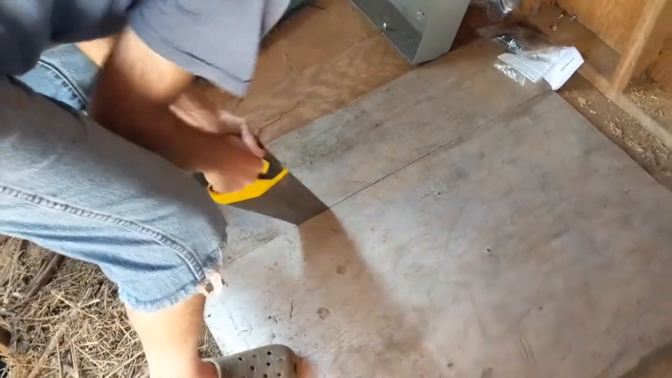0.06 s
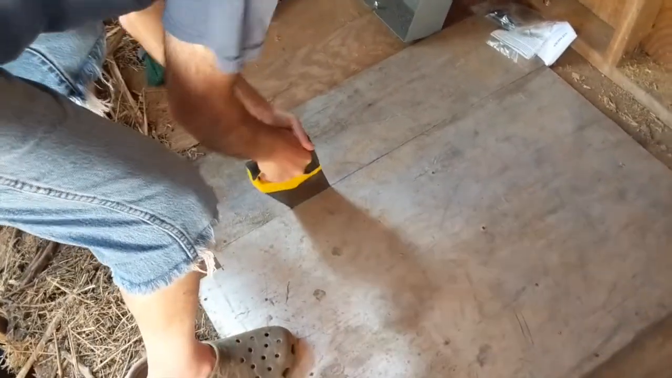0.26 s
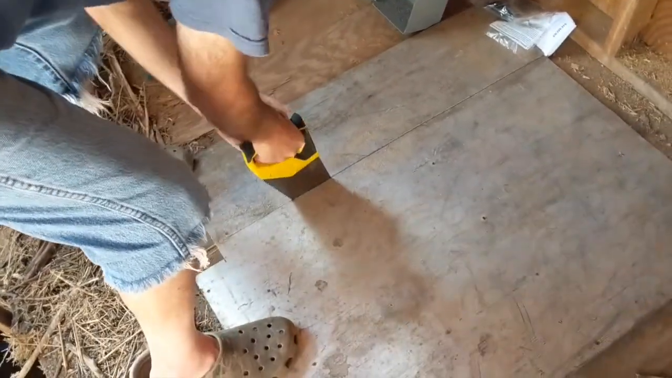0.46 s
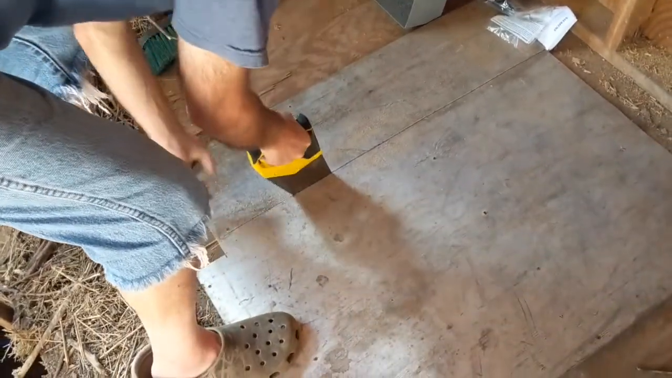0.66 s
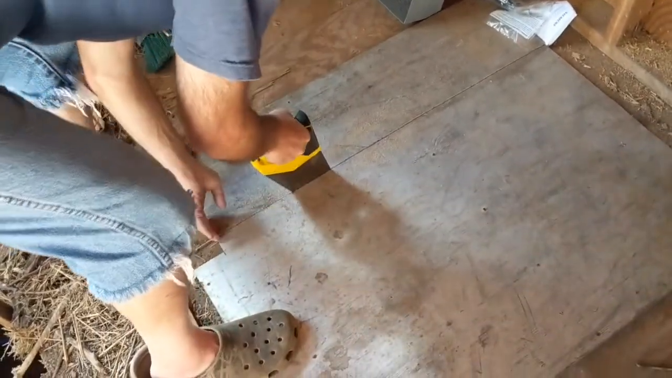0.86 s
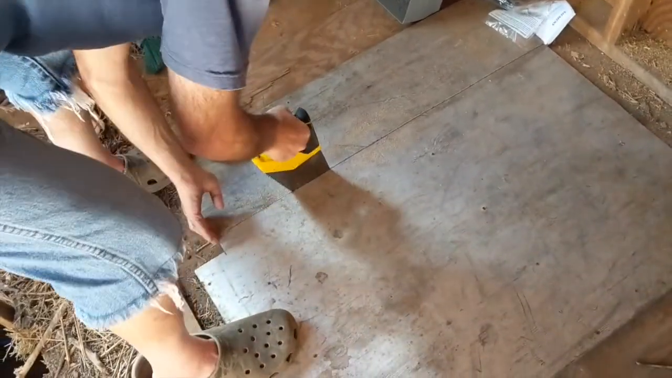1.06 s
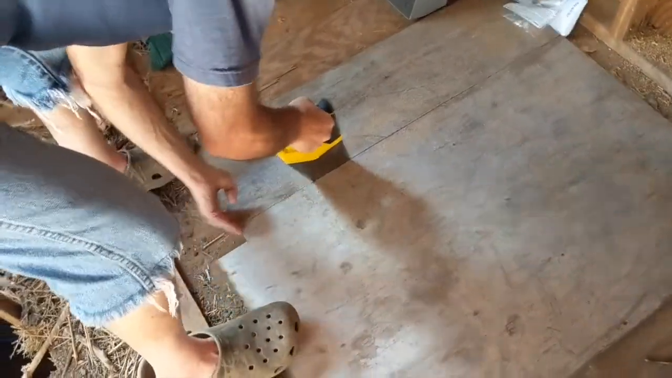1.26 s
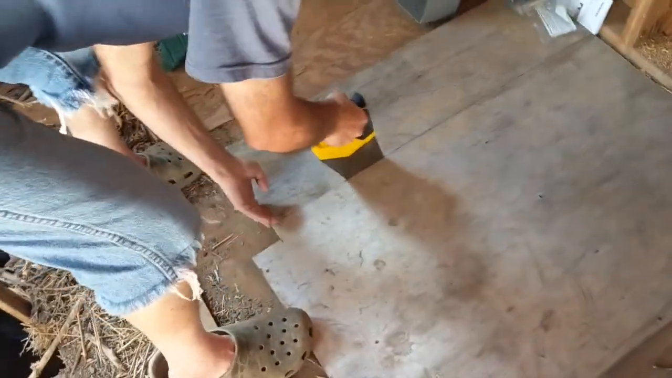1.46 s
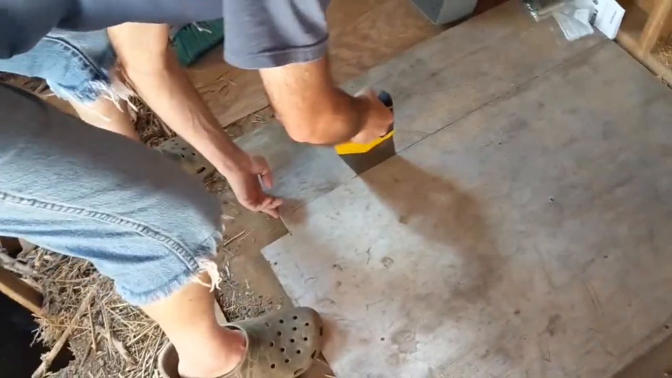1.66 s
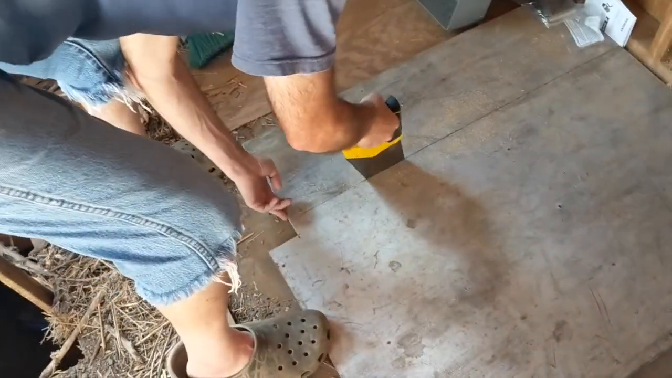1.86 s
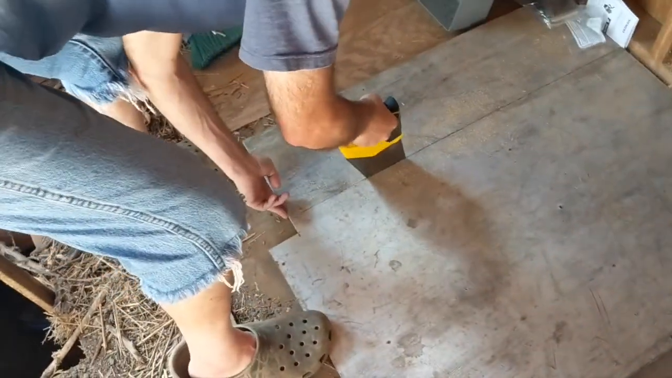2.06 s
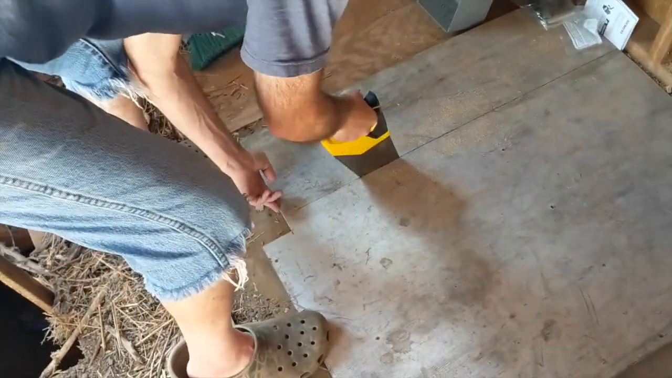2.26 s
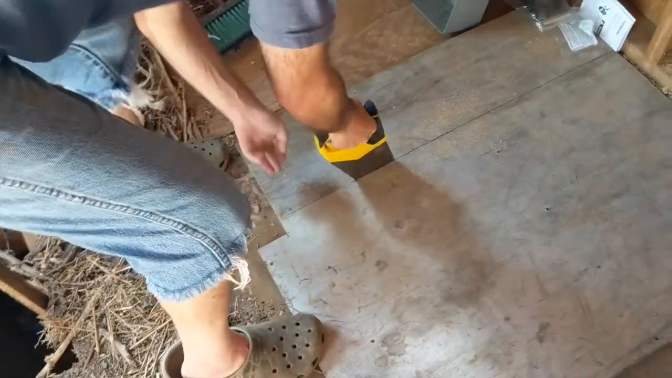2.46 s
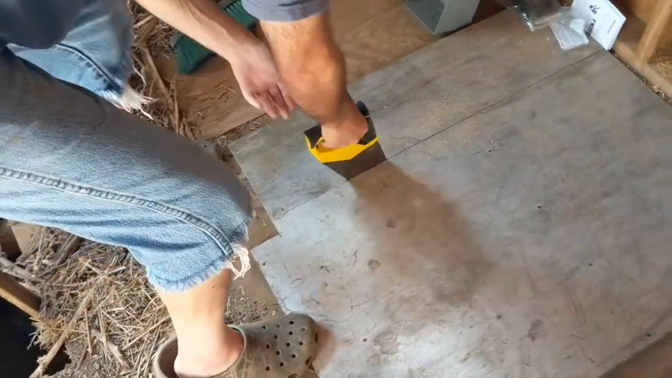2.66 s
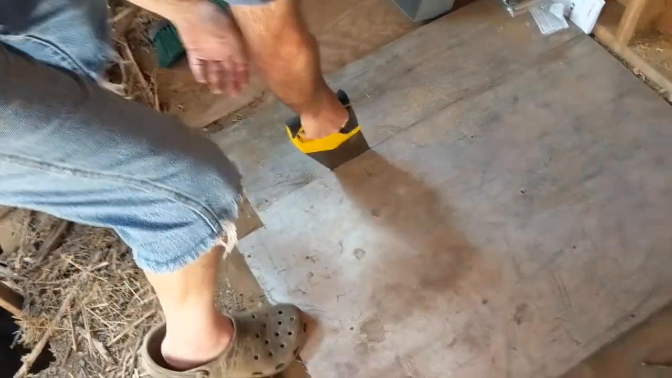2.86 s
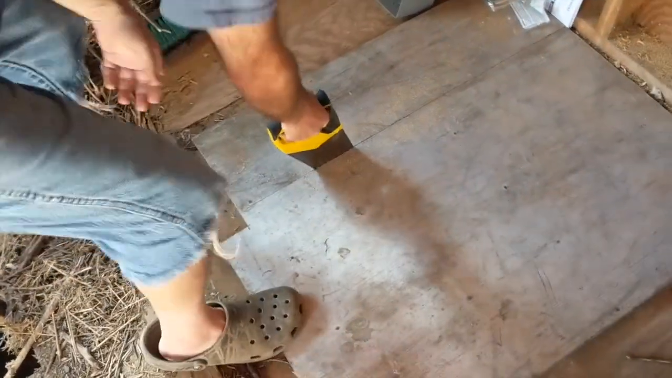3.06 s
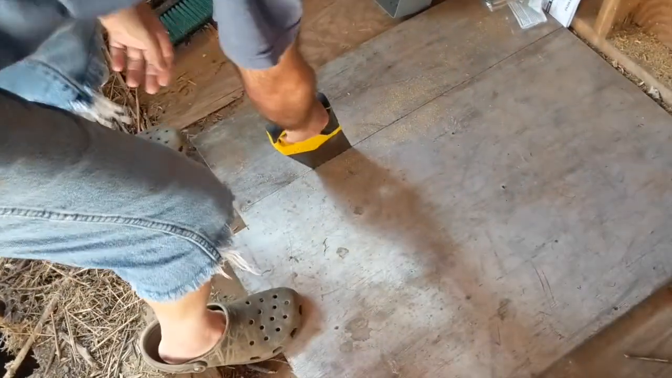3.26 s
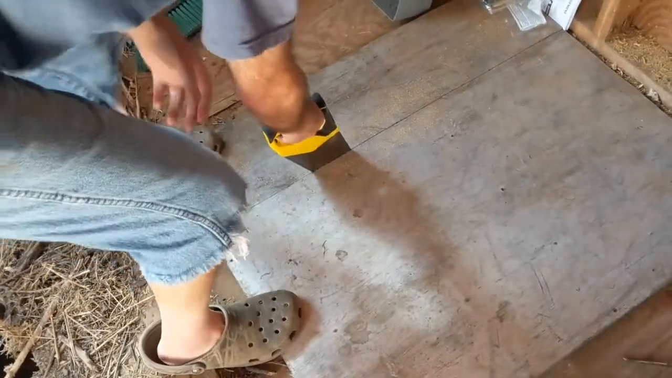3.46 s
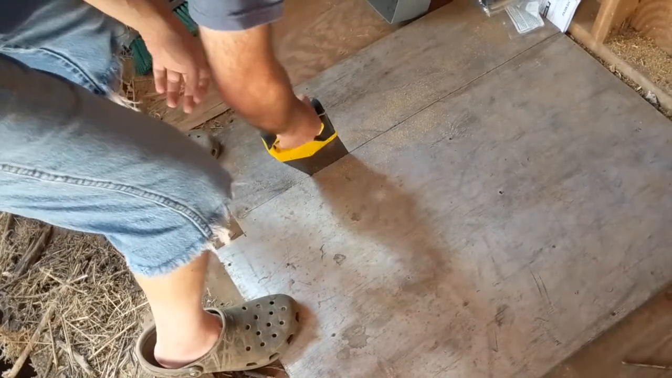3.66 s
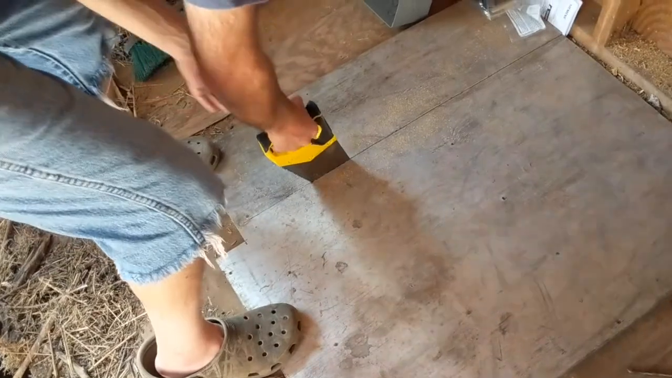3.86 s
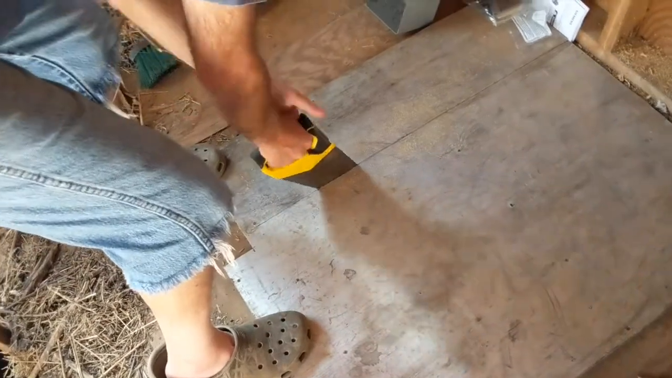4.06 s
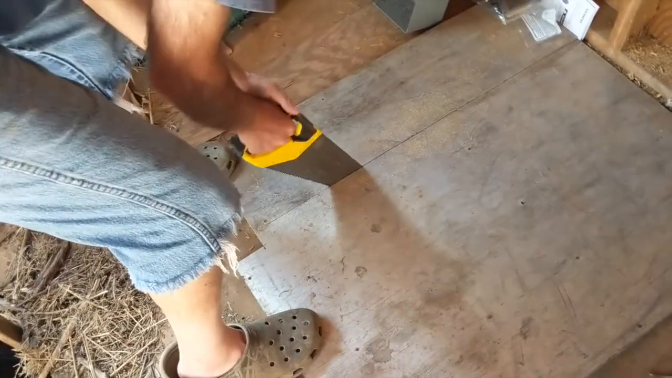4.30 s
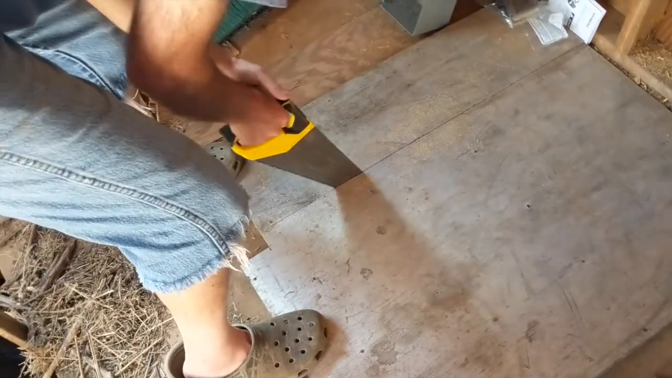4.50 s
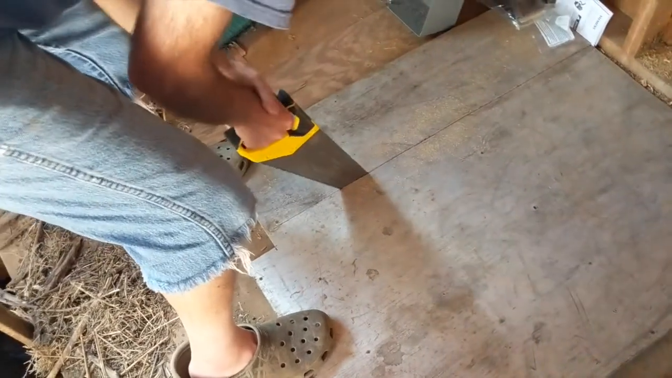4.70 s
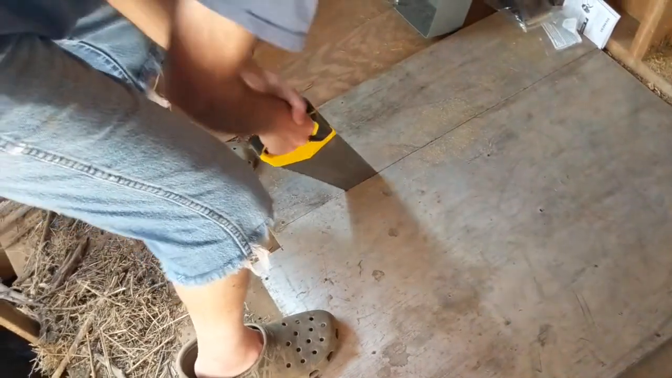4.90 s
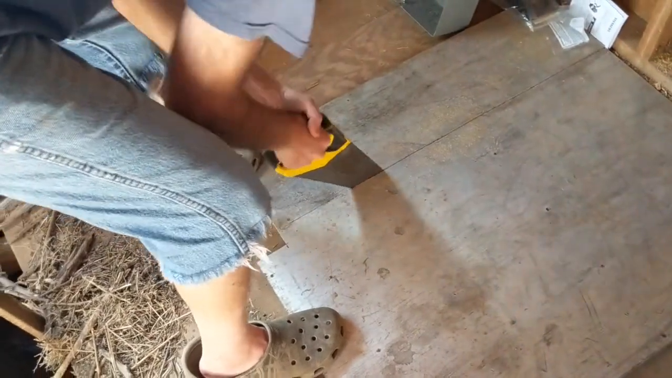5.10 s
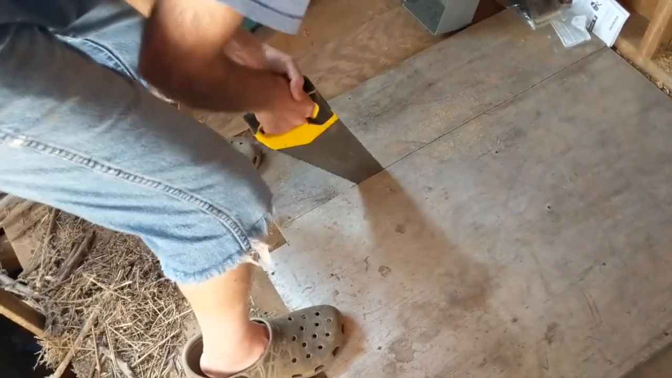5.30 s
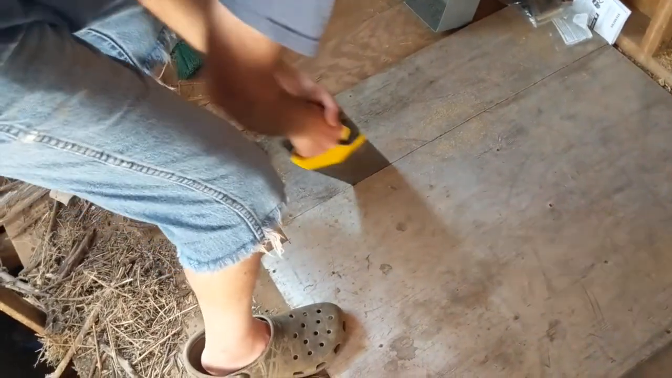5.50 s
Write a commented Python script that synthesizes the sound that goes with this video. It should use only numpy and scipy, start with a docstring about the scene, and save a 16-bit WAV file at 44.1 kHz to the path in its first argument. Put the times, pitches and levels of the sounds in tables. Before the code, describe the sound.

A hand saw cuts a plywood floor panel in a bare room, heard from close by. A few short rasping strokes shake the board, then the blade jams with a heavy thump and rattles in the cut. A quieter stretch follows, with light taps of wood scraps and two more thumps. Uneven strokes resume, juddering, with a sharp steel clack near the end. Very faint hum, hiss and outdoor insects lie behind.

```python
"""Hand saw in plywood

A hand saw cuts a plywood floor panel, already rumbling, in short, uneven strokes, in a bare room. Its
teeth tear fibres, ring the blade and shake the panel. The blade jams and thumps the board, judders and
clacks in the kerf; wood scraps tap the floor. Behind: faint air, mains hum, hiss and insects outdoors."""
import sys
import numpy as np
from scipy import signal
from scipy.fft import rfft, irfft, next_fast_len
from scipy.io import wavfile
from scipy.ndimage import uniform_filter1d, map_coordinates

SR = 44100
rng = np.random.default_rng(int(sys.argv[2]) if len(sys.argv) > 2 else 0)


def master_out(mix):
    """Clip the mix to full scale and print it as 16-bit PCM to the path in sys.argv[1]."""
    frames = np.transpose(np.atleast_2d(mix))
    ceiling = np.clip(frames, -1, 1)
    pcm = np.round(ceiling * 32767).astype(np.int16)
    wavfile.write(sys.argv[1], SR, pcm)


N = 244314


def amp(db):
    """Decibels to gain."""
    return 10 ** (np.asarray(db) / 20)


def unit(x):
    """Scale to rms 1."""
    return x / np.sqrt(np.mean(x ** 2) + 1e-20)


def along(points, hz):
    """Interpolate (frequency [Hz], value) points on a log axis."""
    f, v = np.transpose(points)
    return np.interp(np.log(hz + 1), np.log(f), v)


def wobble(knots_per_s):
    """Smooth random curve."""
    knots = rng.standard_normal(int(N * knots_per_s / SR) + 4)
    return map_coordinates(knots, [np.arange(N) * knots_per_s / SR])


def coloured(x, spectrum):
    """Minimum-phase filter of unit energy with the given spectrum."""
    size = 8192
    cepstrum = irfft(np.log(amp(along(spectrum, np.fft.rfftfreq(size, 1 / SR)))))
    cepstrum[1:size // 2] *= 2
    cepstrum[size // 2 + 1:] = 0
    pulse = irfft(np.exp(rfft(cepstrum)))
    return signal.fftconvolve(x, pulse / np.linalg.norm(pulse))[:len(x)]


def band(hz, width_hz):
    """Narrowband noise, rms 1."""
    f = np.fft.rfftfreq(N, 1 / SR)
    return unit(irfft(rfft(rng.standard_normal(N)) / (1 + (2 * (f - hz) / width_hz) ** 2), N))


def fade(t, t60_s):
    """Exponential decay, 60 dB in t60_s."""
    return np.exp(-np.log(1000) * t / t60_s)


def burst(t, t60_s):
    """Decaying white noise."""
    return rng.standard_normal(len(t)) * fade(t, t60_s)


def ring(modes, t, scatter_db):
    """Decaying modes; strengths and signs vary with each contact."""
    hz, db, t60_s = np.transpose(modes)[:, :, None]
    gain = amp(db + scatter_db * rng.standard_normal(hz.shape)) * rng.choice([-1, 1], hz.shape)
    return np.sum(gain * np.sin(2 * np.pi * hz * t) * fade(t, t60_s), axis=0)


def favouring(modes, hz, db, octaves):
    """The contact point favours modes near hz; the rest drop by up to db."""
    f, level_db, t60_s = np.transpose(modes)
    nearness = np.exp(-(np.log2(f / hz) / octaves) ** 2)
    return np.transpose([f, level_db + db * (nearness - 1), t60_s])


def resonate(x, modes):
    """Drive a modal response of unit energy with x."""
    response = ring(modes, np.arange(SR // 3) / SR, scatter_db=0.5)
    return signal.fftconvolve(x, response / np.linalg.norm(response))[:len(x)]


def add(track, time_s, sound):
    """Mix a sound in at time_s."""
    start = round(time_s * SR)
    track[start:start + len(sound)] += sound[:N - start]


def arch_db(t, start_s, rise_s, hold_s, fall_s):
    """The arm speeds up, holds and slows: 0 dB in the hold, -20 dB at the stroke's start and end."""
    away = np.maximum((start_s + rise_s - t) / rise_s, (t - start_s - rise_s - hold_s) / fall_s)
    return -20 * np.clip(away, 0, 4) ** 1.4


def teeth(speed, tooth_hz=619.5, catch_scatter_db=2.0, fibre_scatter_db=3, rub=0.74):
    """Teeth catch in turn; each tears fibres and tugs the panel. Returns cutting noise and force."""
    rate_hz = tooth_hz * speed * amp(2.2 * wobble(40))
    passing = np.diff(np.floor(np.cumsum(rate_hz) / SR), prepend=0)
    bites = passing * amp(catch_scatter_db * rng.standard_normal(N)) / np.sqrt(rate_hz)
    tearing = unit(signal.fftconvolve(bites, fade(np.arange(SR // 50) / SR, 0.018))[:N])
    fibres = unit(rng.standard_normal(N) * amp(fibre_scatter_db * rng.standard_normal(N)))
    grain = amp(1.67 * wobble(130))  # hard and soft wood layers
    cut = unit(fibres * (rub + tearing) * grain)
    tugs = unit(bites - uniform_filter1d(bites, SR // 150))
    return cut, unit(cut + .5 * tugs)


def fibre_snaps(snaps_per_s=80, scatter_db=3):
    """Thicker fibres snap at random."""
    snaps = (rng.random(N) < snaps_per_s / SR) * amp(scatter_db * rng.standard_normal(N))
    return unit(signal.fftconvolve(snaps, burst(np.arange(SR // 50) / SR, t60_s=0.017))[:N])


def kerf(x, ring_db=-3.5):
    """The narrow cut rings briefly, differently at each stroke."""
    response = burst(np.arange(SR // 16) / SR, t60_s=0.033)
    ringing = unit(signal.fftconvolve(x, response)[:len(x)])
    return unit(x + amp(ring_db) * ringing)


# Panel bending modes (frequency [Hz], level [dB], t60 [s])
PANEL_MODES = [(62.6, -5.5, 0.21), (69.8, -9.5, 0.069), (127.3, -4, 0.16), (150.7, -9, 0.36),
               (185.2, -0.5, 0.12), (229.2, -11.5, 0.36), (277, -13.5, 0.086), (308.1, -3.5, 0.13),
               (364, 0, 0.088), (394.2, -3.5, 0.098), (434.2, -5.5, 0.11), (503, -10.5, 0.23),
               (550, -9, 0.074), (610.7, -3.5, 0.085), (681.7, -10.5, 0.1), (839, -11.5, 0.093),
               (915, -17.5, 0.17), (1025, -12, 0.033)]
# Steel blade modes (frequency [Hz], level [dB], t60 [s])
BLADE_MODES = [(1272, -1.5, 0.13), (1401, -9, 0.2), (1582, -17, 0.18), (1740, -18, 0.039),
               (2025, -3, 0.025), (2383, -2.5, 0.083), (3207, -3.5, 0.1), (3268, -26, 0.15),
               (3450, -1, 0.083), (4367, 4, 0.064), (4380, -0.5, 0.012), (4710, -5, 0.021),
               (4900, 8, 0.012), (5290, 0, 0.023), (5530, -9, 0.082), (5950, 0.5, 0.052), (6250, -21, 0.15),
               (6870, 1, 0.075)]
# Tearing fibres (frequency [Hz], density [dB])
RASP_SPECTRUM = [(100, -20.5), (400, 2.5), (800, 1.5), (1400, 2), (2300, 2), (2900, -3), (3900, -1),
                 (5000, 0.5), (7000, -3), (7800, -8.5), (10000, -13), (12000, -17), (16000, -21)]
# Strokes (start [s], rise [s], hold [s], fall [s], level [dB], panel push offset [dB],
#   favoured panel pitch [Hz], emphasis [dB], rasp tilt [dB/octave])
SAW_STROKES = [ (0.0, 0.045, .04, .11, -30.5, 4, 460, 5.5, 0.5),
               (.178, 0.053, 0.055, .068, -22.5, 4.5, 550, 9, -.7),
               (0.353, .04, 0.023, .12, -53, 13.5, 200, 13, 3.5),
               (1.195, 0.044, 0.024, 0.039, -51.5, -4, 220, 1.5, -3.5),
               (1.263, 0.12, 0.042, 0.091, -29, -0.5, 223, 6.5, -0.5),
               (1.823, 0.093, 0.047, 0.075, -54.5, 0, 200, 4.5, 3.5),
               (2.14, 0.097, 0.096, 0.15, -53.5, -1, 230, 12, 0.5),
               (3.074, .02, .035, 0.074, -46, 8.5, 270.4, 4, -1.5),
               (3.44, .075, 0.065, .08, -42.5, 6.5, 328, 3, -2),
               (4.11, .045, .07, 0.12, -38, 2.5, 228.1, 6, 1.5),
               (4.4, 0.028, 0.0096, .1, -49.5, 6, 226, 5.5, 2),
               (4.468, .04, 0.05, .12, -46, 6.5, 222.6, 4.5, 2),
               (4.621, 0.038, 0.025, .13, -53.5, 8.5, 221.4, 6, 1),
               (4.888, .06, 0.016, 0.073, -27, 6.5, 380, 9.5, -0.4),
               (5.203, 0.1, 0.028, .1, -37, 4, 201.8, 1.5, 2),
               (5.399, 0.027, .02, 0.061, -48.5, 17, 395, 7, -1.5),
               (5.457, .06, .03, 0.076, -22.5, 4, 400, 2.5, 0.5)]


def sawing(rasp_db, steel_db, panel_db, push_lag_s=0.002):
    """Each stroke rasps in the kerf, rings the blade and shakes the panel."""
    out, t = np.zeros(N), np.arange(N) / SR
    effort = np.max([amp(stroke[4] + arch_db(t, *stroke[:4])) for stroke in SAW_STROKES], axis=0)
    cut, force = teeth(speed=(effort / effort.max() + .01) ** .25)  # harder strokes are faster
    grit = unit(cut + amp(-5.5) * fibre_snaps())
    for *timing, db, push_db, hz, emphasis_db, tilt_db_per_oct in SAW_STROKES:
        start_s, rise_s, hold_s, fall_s = timing
        near = (t > start_s - rise_s / 2) & (t < start_s + rise_s + hold_s + fall_s + .3)
        level = amp(db + arch_db(t[near], *timing))
        # the panel follows less steeply, slightly late
        push = amp(db + push_db + 0.75 * arch_db(t[near] - push_lag_s, *timing))
        spectrum = [(f, d + tilt_db_per_oct * np.log2(f / 1000)) for f, d in RASP_SPECTRUM]
        rasp = coloured(level * kerf(grit[near]), spectrum)
        steel = resonate(level * cut[near], BLADE_MODES)
        board = resonate(push * force[near], favouring(PANEL_MODES, hz, emphasis_db, octaves=0.94))
        out[near] += amp(rasp_db) * rasp + amp(steel_db) * steel + amp(panel_db) * board
    return out


# Room air (frequency [Hz], density [dB])
AIR_SPECTRUM = [(25, -8), (58, -1), (88, -12.5), (125, -4.5), (190, -11), (370, -9.5), (480, -10.5),
                (640, -6), (850, -10.5), (1200, -16.5), (2500, -23.5), (6000, -23), (11000, -31),
                (16000, -33)]


def air():
    """Still air: faint, low, nearly steady noise."""
    return amp(-58.5 + 0.47 * wobble(4.5)) * coloured(rng.standard_normal(N), AIR_SPECTRUM)


def mains_hum(hz=120):
    """One mains tone, wavering slightly in level."""
    t = np.arange(N) / SR
    return amp(-60.5 + wobble(2.065)) * np.sin(2 * np.pi * hz * t)


# Panel thump (frequency [Hz], density [dB])
THUMP_SPECTRUM = [(15, -39), (30, -26), (48, 4), (100, 0), (180, 2), (280, 7), (420, -3), (800, -6),
                  (1500, -21), (4000, -63)]
# Wood crack (frequency [Hz], density [dB])
CRACK_SPECTRUM = [(300, 0), (550, -2.5), (1000, -4), (1550, 12.5), (2100, -1.5), (4400, -1.5), (7500, -3.5),
                  (10000, -16.5), (15000, -26)]
# Thumps (time [s], level [dB], crack offset [dB], favoured pitch [Hz], low cut [Hz], rebound delay [s])
PANEL_THUMPS = [(.004, -26.5, -13, 400, 60.6, .04), (1.409, -14.5, 0, 178, 56, .014),
                (3.095, -25.5, -21, 294, 46, .036), (3.505, -20, -7.5, 384, 48, .022),
                (4.141, -31.5, -22, 69.96, 42, .03), (4.278, -32, -15, 79.95, 42, .03)]


def thumps(rebound_db=-3.5, rebound_crack_db=-9):
    """Low panel thumps: the board already rumbling at the start, then blade jams that crack splinters."""
    out, t = np.zeros(N), np.arange(SR // 2) / SR
    for time_s, db, crack_db, hz, low_cut_hz, rebound_s in PANEL_THUMPS:
        low_cut = signal.butter(4, low_cut_hz, "high", fs=SR, output="sos")
        for delay_s, softer_db, duller_db in [(0, 0, 0), (rebound_s, rebound_db, rebound_crack_db)]:
            board = ring(favouring(PANEL_MODES, hz, db=7.0, octaves=0.26), t, scatter_db=7)
            rumble = unit(board) + 2.9 * unit(burst(t, t60_s=0.24))
            thump = signal.sosfilt(low_cut, coloured(rumble, THUMP_SPECTRUM))
            crack = coloured(burst(t, t60_s=0.078), CRACK_SPECTRUM)
            hit = amp(3.5) * thump / abs(thump).max() + amp(crack_db + duller_db + 0.5) * crack
            add(out, time_s + delay_s, amp(db + softer_db) * hit)
    return out


def chirper(hz=10100, chirps_per_s=4):
    """One tiny insect keeps a near-steady beat."""
    t = np.arange(N) / SR
    beat = np.sin(np.pi * chirps_per_s * t + 1.4 * wobble(2.03)) ** 2
    return amp(-76) * beat * band(hz, width_hz=700)


# Stick-slip in the kerf (peak time [s], 1/e half-width [s], pitch [Hz], rms at peak [dB])
BLADE_JUDDERS = [(0.224, 0.02, 467, -21.5), (0.262, 0.02, 680, -32), (0.273, 0.033, 939, -29),
                 (0.294, 0.02, 291, -24), (0.267, 0.075, 61.5, -31.5), (1.41, 0.017, 10100, -33.5),
                 (1.464, 0.071, 176.5, -27.5), (1.467, 0.066, 231.8, -32), (3.524, .03, 390, -32),
                 (3.56, 0.055, 44.1, -39), (4.952, .03, 681, -36), (4.967, 0.033, 303.1, -18.5),
                 (4.985, 0.026, 231.4, -26), (5.515, 0.035, 609.2, -29), (5.52, .03, 940, -34.5)]


def judders():
    """Stick-slip locks briefly onto one mode, from a low judder to a squeak."""
    out, t = np.zeros(N), np.arange(N) / SR
    for peak_s, half_width_s, hz, db in BLADE_JUDDERS:
        swell = np.exp(-((t - peak_s) / half_width_s) ** 2)
        drift_rad = 1.08 * wobble(70) + 2 * np.pi * hz * np.cumsum(0.013 * wobble(600)) / SR
        out += np.sqrt(2) * amp(db) * swell * np.sin(2 * np.pi * hz * t + drift_rad)
    return out


# Buzzes (start [s], end [s], centre [Hz], width [Hz], rms [dB])
INSECT_BUZZES = [(0.802, 1.301, 4670, 401.3, -70.5), (0.847, 1.3, 6250, 587, -69.5),
                 (1.497, 2.898, 7860, 1199, -67), (1.674, 3.393, 5970, 1860, -65),
                 (2.8, 3.354, 4640, 600, -63), (2.8, 3.196, 6310, 602, -68),
                 (4.551, 5.248, 4727, 555.7, -60), (4.55, 5.252, 6262, 800, -64)]


def insects(ramp_s=0.14):
    """Insects buzz outdoors: flickering noise bands swell and fade."""
    out, t = np.zeros(N), np.arange(N) / SR
    for start_s, end_s, hz, width_hz, db in INSECT_BUZZES:
        swell = np.clip(np.minimum(t - start_s, end_s - t) / ramp_s, 0, 1)
        out += amp(db + wobble(10) + wobble(51)) * swell * band(hz, width_hz)
    return out


# Hiss colour (frequency [Hz], density [dB])
HISS_SPECTRUM = [(2000, -13), (3300, -0.5), (4000, -3), (4700, -5.5), (6300, -14), (8000, -2.5),
                 (9200, -13), (10200, -6), (12000, -25)]
# Hiss envelope (time [s], level [dB])
HISS_ENVELOPE = [(.8, -97), (1.2, -61), (1.8, -59.5), (2.1, -64.5), (2.6, -65.5), (3.4, -65.5),
                 (3.9, -68.5), (4.1, -83), (4.8, -65)]


def hiss():
    """A thin hiss comes and goes."""
    level_db = np.interp(np.arange(N) / SR, *np.transpose(HISS_ENVELOPE))
    return amp(level_db) * coloured(rng.standard_normal(N), HISS_SPECTRUM)


# Steel slapping wood (frequency [Hz], density [dB])
SLAP_SPECTRUM = [(150, 4), (700, -6.5), (1400, -3), (2300, -2.5), (3400, -4), (5200, 2.5), (7000, -1),
                 (8500, -4), (12000, -14.5), (16000, -17)]
# Clacks (time [s], level [dB], ring offset [dB], rattle t60 [s], favoured pitch [Hz])
BLADE_CLACKS = [(1.513, -33, -3, 0.07, 4400), (1.574, -25, 4, .02, 4980), (1.591, -36, 3, .02, 4623),
                (1.626, -27, 4, 0.02, 4330), (1.648, -28, -2, 0.14, 4430), (2.22, -41, -6, 0.05, 7180),
                (2.249, -41.5, 3, .013, 3200), (2.332, -32, -3, 0.028, 5850),
                (3.114, -36.5, -11.5, .015, 5500), (3.547, -29, -6, .015, 7100),
                (3.564, -36, -9, .015, 4400), (3.579, -27.5, -1.5, 0.024, 4570),
                (4.495, -34.5, -14, 0.038, 4996), (4.905, -34.5, -10, 0.053, 5000),
                (5.064, -14.5, -4, 0.099, 5647), (5.225, -29.5, -16, 0.085, 6000)]


def clacks(focus_octaves=1.23):
    """Steel slaps the side of the kerf, rattles briefly and rings on."""
    out, t = np.zeros(N), np.arange(SR // 2) / SR
    for time_s, db, ring_db, t60_s, hz in BLADE_CLACKS:
        focus_db = 6.5 * min(amp(ring_db), 1)  # freer ringing gathers the slap round its pitch
        spectrum = [(f, d + focus_db * np.exp(-(np.log2(f / hz) / focus_octaves) ** 2))
                    for f, d in SLAP_SPECTRUM]
        slap = coloured(burst(t, t60_s), spectrum)
        steel = ring(favouring(BLADE_MODES, hz, db=16, octaves=.28), t, scatter_db=1.5)
        pinch = fade(t, 6 * t60_s)  # a tight kerf damps the ring too
        add(out, time_s, amp(db - 2.5) * (slap + amp(ring_db - 6) * steel * pinch))
    return out


# Wood scrap modes (frequency [x pitch], level [dB], t60 [s])
SCRAP_MODES = [(.92, -17, .02), (1.05, 0.5, 0.024), (1.35, -4, .025), (1.7, -22, 0.013)]
# Contact noise (frequency [x pitch], density [dB])
TICK_SPECTRUM = [(.25, -15), (1, 2), (1.4, 3), (1.8, -9), (3.8, -10.5), (5, -30), (9, -56)]
# Taps (time [s], level [dB], pitch [Hz])
SCRAP_TAPS = [(2.096, -47, 1074), (2.122, -35, 1141), (2.774, -44.5, 2783), (3.164, -24.5, 1329),
              (3.192, -37, 1500)]


def taps():
    """Dry wood scraps hit the floor, each with a short, hollow knock."""
    out, t = np.zeros(N), np.arange(SR // 4) / SR
    for time_s, db, hz in SCRAP_TAPS:
        knock = sum(amp(mode_db) * np.sin(2 * np.pi * ratio * hz * t) * fade(t, t60_s)
                    for ratio, mode_db, t60_s in SCRAP_MODES)
        tick = coloured(burst(t, t60_s=0.037), [(ratio * hz, d) for ratio, d in TICK_SPECTRUM])
        add(out, time_s, amp(db - 4) * (knock + 0.81 * tick))
    return out


# Reverberation (frequency [Hz], t60 [s])
ROOM_DECAY = [(100, 0.84), (400, 0.48), (2000, 0.43), (6000, 0.25), (14000, 0.25)]


def room(x, wet_db):
    """Bare walls reflect; the treble dies first."""
    hz, t, noise = signal.stft(rng.standard_normal(SR), SR, nperseg=256)
    tail = signal.istft(noise * fade(t, along(ROOM_DECAY, hz)[:, None]), SR, nperseg=256)[1]
    tail = np.pad(tail / np.linalg.norm(tail), (SR // 200, 0))  # 5 ms pre-delay
    return x + amp(wet_db) * signal.fftconvolve(x, tail)[:N]


def scene():
    """Saw and scraps in the room over a dry background, mono."""
    saw = sawing(rasp_db=-0.5, steel_db=-10.5, panel_db=-2.0) + judders() + thumps()
    work = room(saw, wet_db=-13.0) + room(clacks(), wet_db=-5.5) + room(taps(), wet_db=-5.5)
    return (work + chirper() + insects() + air() + mains_hum() + hiss())[None]


def record(dry):
    """Roll off the deepest rumble; cut everything above top_hz."""
    top_hz = 15900
    size = next_fast_len(N + SR // 2)
    hz = np.fft.rfftfreq(size, 1 / SR)
    low_cut = amp(along([(20, -26), (32, -8), (48, 0)], hz))
    return irfft(rfft(dry, size) * low_cut * (hz < top_hz), size)[:, :N]


dry = scene()
out = record(dry)
master_out(out)
```